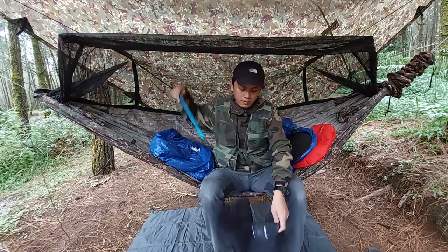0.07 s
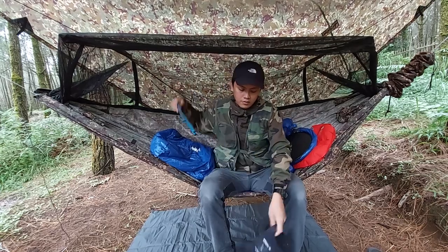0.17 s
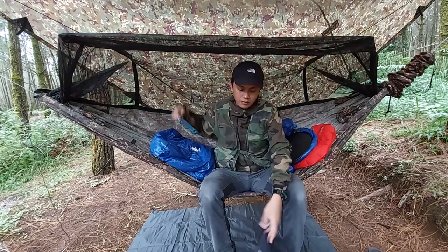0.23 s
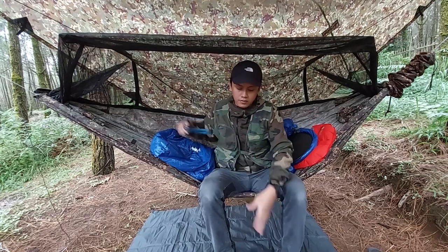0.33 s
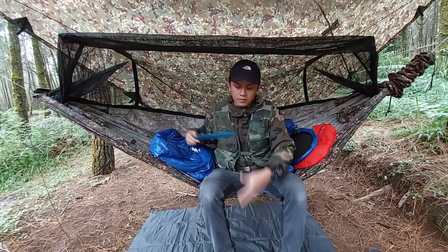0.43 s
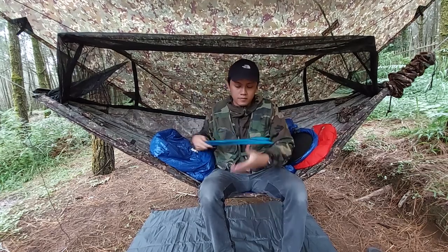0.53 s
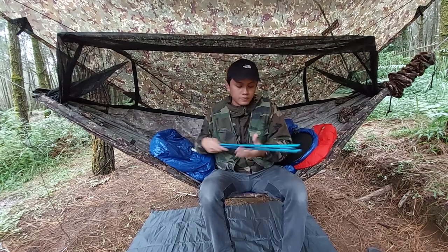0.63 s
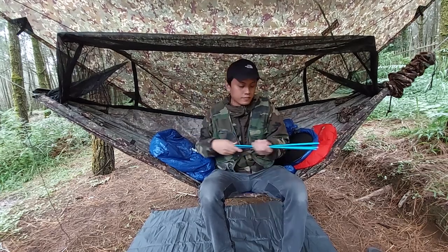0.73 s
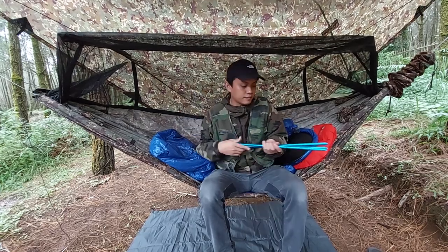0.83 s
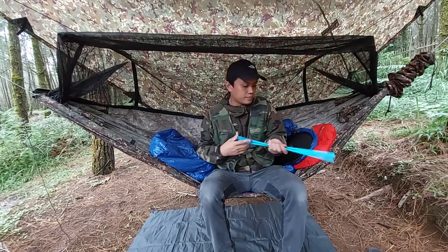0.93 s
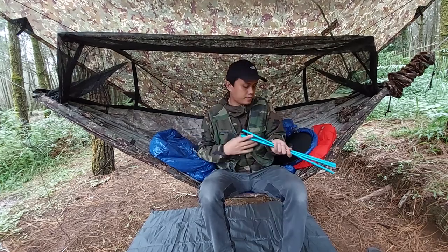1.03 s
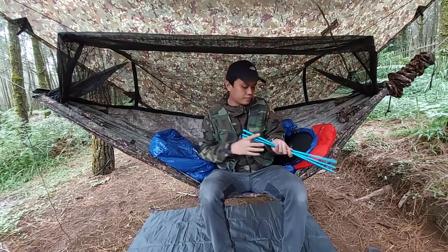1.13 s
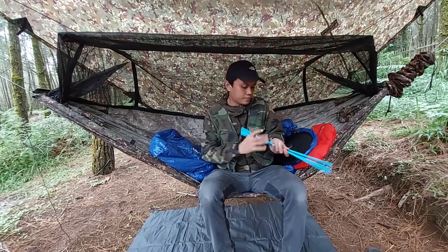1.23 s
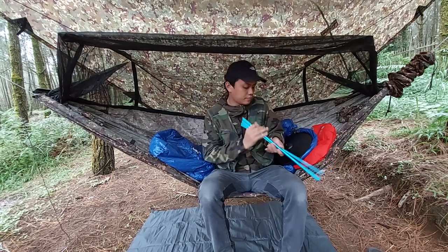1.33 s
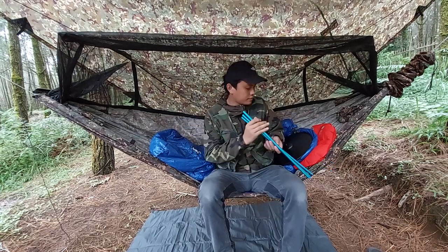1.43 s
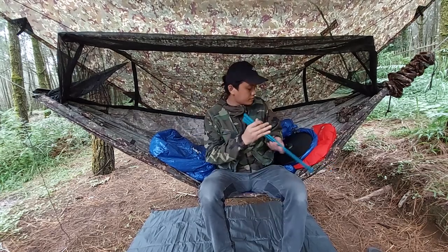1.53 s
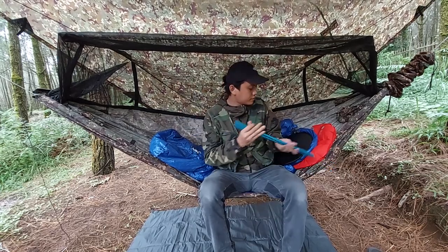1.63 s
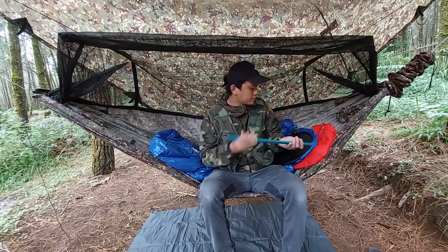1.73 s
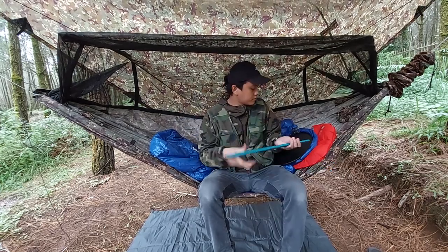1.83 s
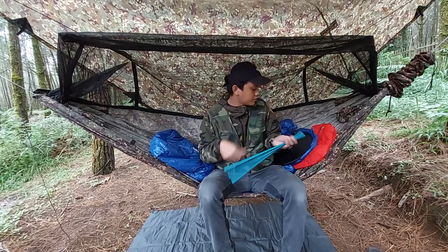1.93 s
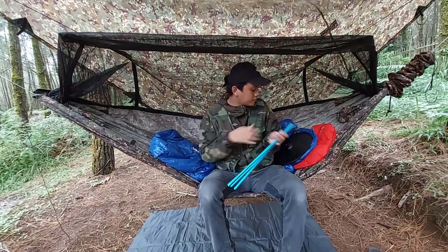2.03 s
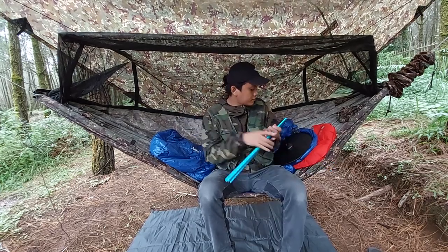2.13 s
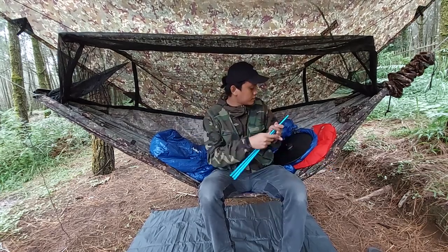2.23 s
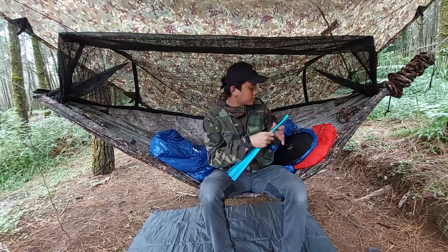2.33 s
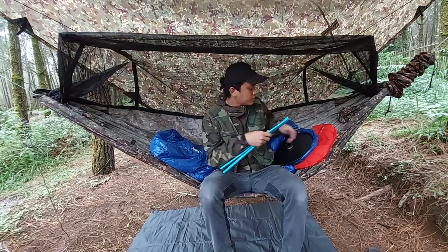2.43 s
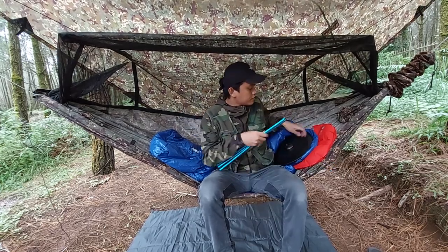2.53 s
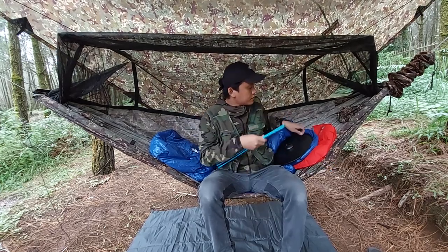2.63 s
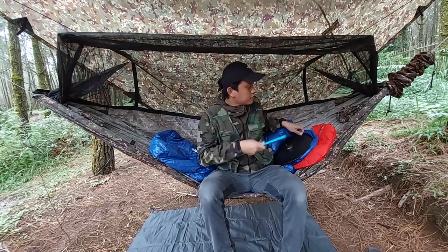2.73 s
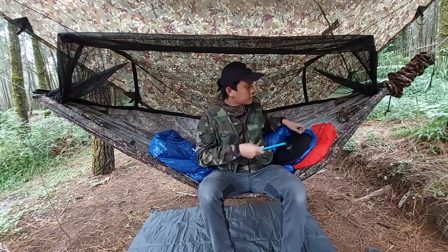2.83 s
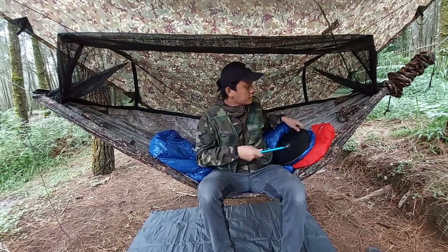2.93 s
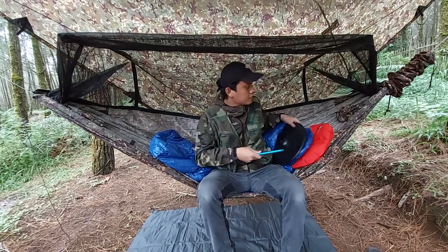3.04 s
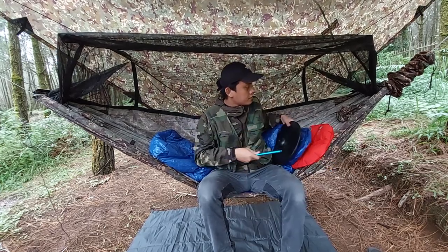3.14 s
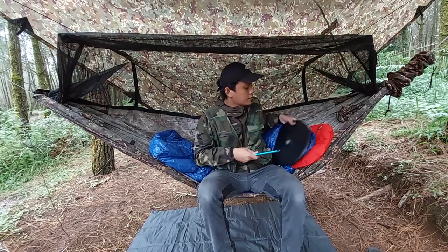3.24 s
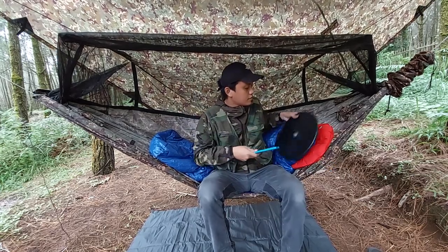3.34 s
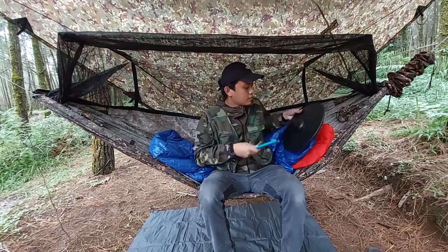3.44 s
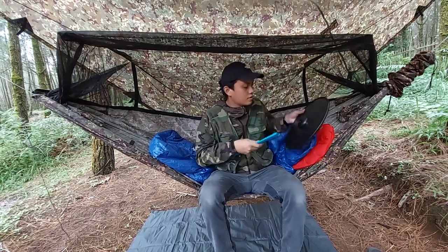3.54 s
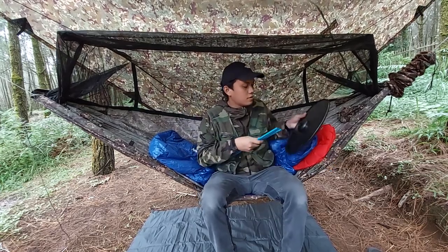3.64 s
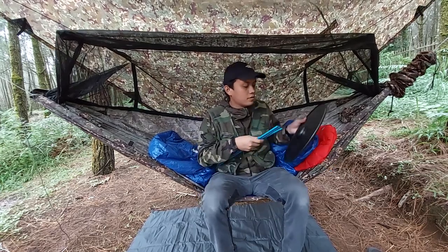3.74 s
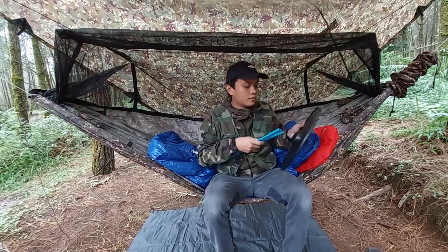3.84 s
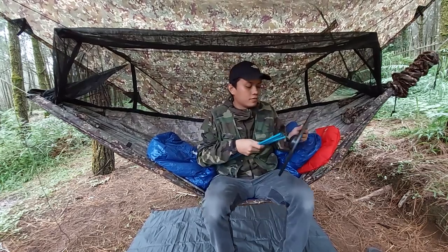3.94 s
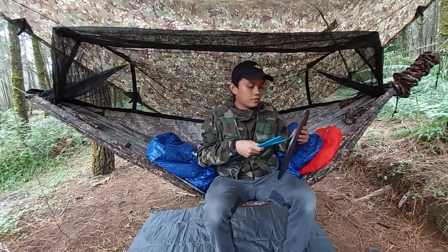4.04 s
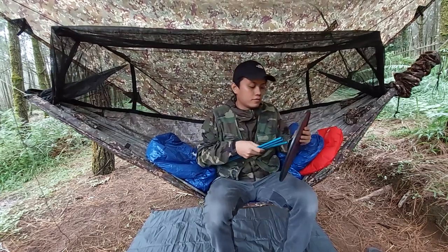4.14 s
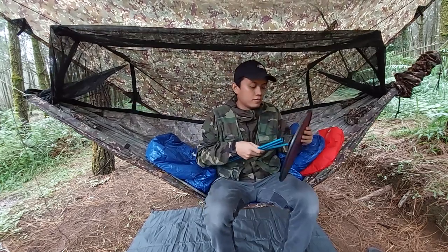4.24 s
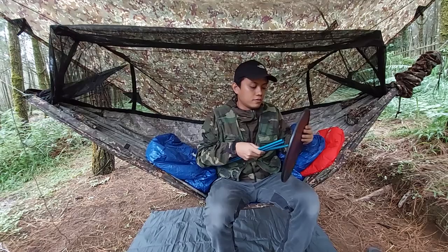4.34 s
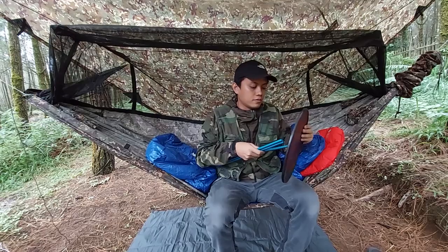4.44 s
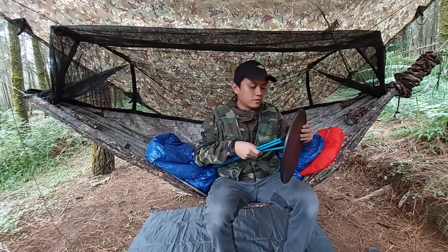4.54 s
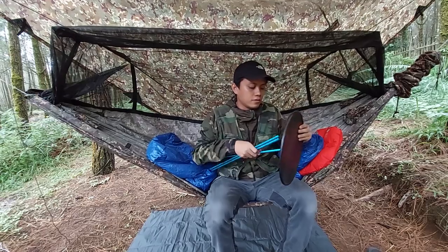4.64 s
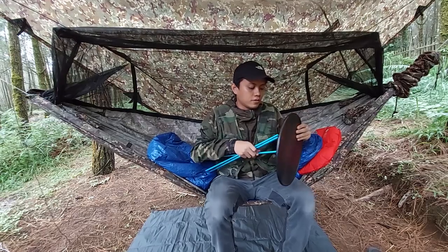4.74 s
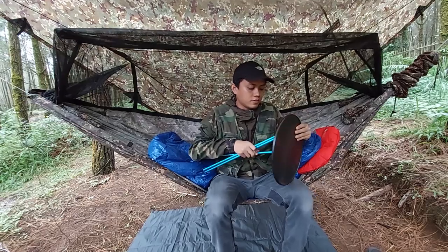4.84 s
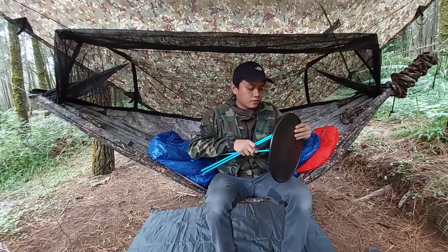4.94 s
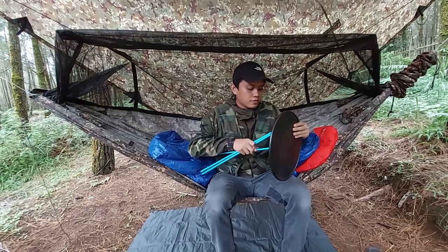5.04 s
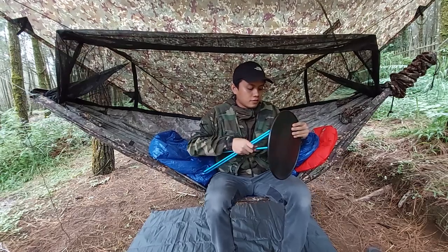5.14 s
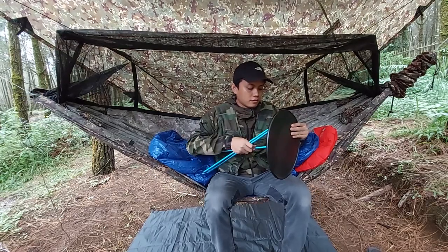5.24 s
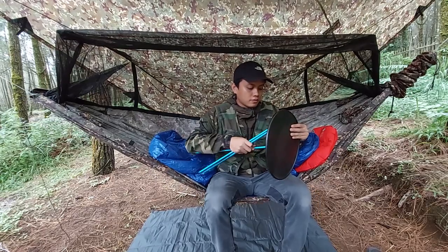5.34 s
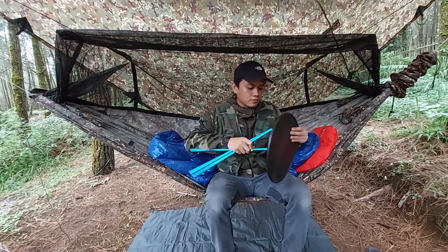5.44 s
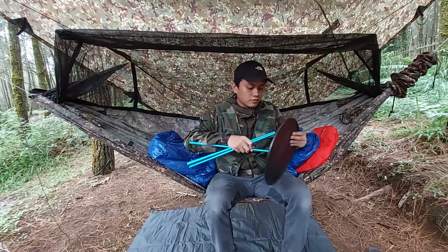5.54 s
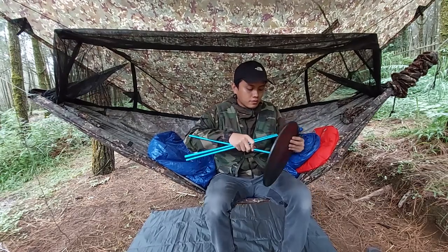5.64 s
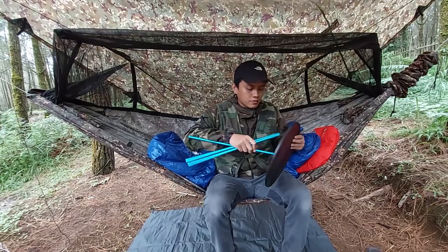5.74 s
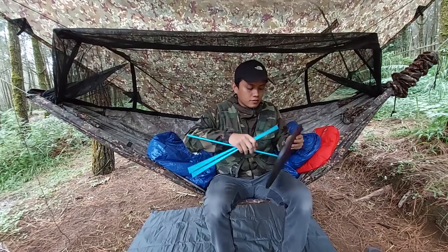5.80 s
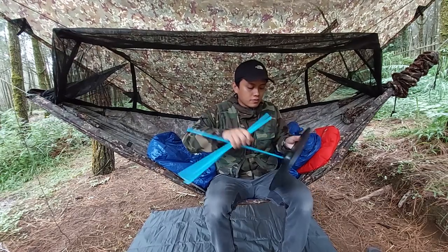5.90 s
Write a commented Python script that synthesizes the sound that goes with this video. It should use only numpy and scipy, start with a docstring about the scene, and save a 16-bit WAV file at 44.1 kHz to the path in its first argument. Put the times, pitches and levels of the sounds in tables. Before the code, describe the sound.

Close handling of a small folding camp table outdoors. A quick fabric swish, a brief ringing slide of a metal leg, then bright clicks that crowd into a sharp snap. Soft cloth rubbing follows, and a few hollow knocks on the light top, the strongest near the end. Cicadas drone steadily over a low air rumble; the mono microphone hears a dry, open forest space.

```python
"""In a forest, a folding camp table is put together. Its carrying bag is whisked away, the jointed aluminium legs
slide, rattle and snap into their hub, then the round top is picked up and knocked against them.
Impacts are struck resonances over a short clatter; slides are resonances kept ringing by tiny jerks.
Cicadas drone all around as bands of noise, the nearest one throbbing, over a low rumble of moving air."""
import sys
import numpy as np
from scipy import signal
from scipy.fft import rfft, irfft, next_fast_len
from scipy.io import wavfile
from scipy.ndimage import uniform_filter1d

SR = 44100
rng = np.random.default_rng(int(sys.argv[2]) if len(sys.argv) > 2 else 0)


def transcribe(signal):
    """Save signal, clipped to [-1, 1], as a 16-bit WAV file at the path in sys.argv[1]."""
    frames = np.atleast_2d(signal).T
    limited = np.clip(frames, -1, 1)
    pcm = np.round(limited * 32767).astype(np.int16)
    wavfile.write(sys.argv[1], SR, pcm)


N = 263277
TIME = np.arange(N) / SR
BLOW_TIME = TIME[:SR // 4]

# legs clicking together: (time [s], middle register level [dB], contact hardness [dB], spot resonance [Hz])
LEG_CLICKS = [(1.339, -52, -8, 5170), (1.7077, -32, 3.5, 7180), (1.766, -43, -5, 4410),
              (1.8676, -53, 2, 4900), (1.89, -42.5, 5, 6700), (1.9406, -29.5, 5.5, 4950),
              (2.0059, -24.5, 5, 5320), (2.2179, -34.5, 7, 6800), (2.3118, -42.5, -8, 5100),
              (2.3679, -34, 9, 5400), (2.373, -29, 8, 5270), (2.387, -17, 0.5, 6800),
              (2.4121, -29, -13, 4160), (2.7202, -48, 36, 4260), (2.8693, -57, -17, 4950),
              (4.172, -45, -12, 6950)]
# resonances of the joined frame: (frequency [Hz], undamped-by-hand width [Hz], relative level [dB])
FRAME_MODES = [(2640, 63, -12), (3657, 13, -6), (3800, 28, -25), (4000, 48, -9), (5160, 90, 1.5),
               (5190, 27, -12), (5370, 58, -2), (5600, 50, -24), (6470, 46, -2.5), (6673, 36, -8),
               (6680, 72, 2), (7150, 68, -4.5), (7650, 38, -21), (8220, 120, -4), (9900, 100, -5),
               (10330, 44, -9), (12360, 21, -13), (11960, 120, -1), (13400, 150, 0), (12500, 160, -2),
               (14600, 98, -7.5)]
# clatter spectrum of the frame: (frequency [Hz], relative density [dB per Hz])
FRAME_CLATTER = [(410, -59), (700, -3), (1090, -33), (1600, -24), (1820, -27), (2590, -10), (2920, -17.5),
                 (4100, -7.5), (4670, -4.5), (5120, -5.5), (5840, -8.5), (6740, -6), (8880, -15.5),
                 (12300, -9.5), (16000, -62)]
CLICK_T60_S = 0.059  # decay of the clatter
CLICK_LOW_DB, CLICK_TREBLE_DB = -19, -3.5  # against the middle register, at hardness 0
HARDNESS_TO_TREBLE = 0.26  # hardness is taken off the lows; this share of it is added to the treble
CLICK_RING_DB, CLICK_DAMPING = 8, 0.66  # clear modes over the clatter; factor on their widths


def leg_clicks():
    """Metal on metal: the harder the contact, the thinner and brighter the click."""
    out = np.zeros(N)
    for s, middle_db, hardness_db, spot_hz in LEG_CLICKS:
        # the touched spot brings out one resonance of its own
        modes = [*FRAME_MODES, (spot_hz, 70, 5)]
        hit = blow(modes, FRAME_CLATTER, CLICK_T60_S, ring_db=CLICK_RING_DB, damping=CLICK_DAMPING,
                   spread_db=6, contact_s=.0005)
        low_db = middle_db + CLICK_LOW_DB - hardness_db
        treble_db = middle_db + CLICK_TREBLE_DB + HARDNESS_TO_TREBLE * hardness_db
        low = register(hit, 1210, 3040, low_db)
        middle = register(hit, 4340, 7700, middle_db)
        treble = register(hit, 8600, .45 * SR, treble_db)
        add(out, s, low + middle + treble)
    return out


# the catch of the hub: (time [s], spike height before the low cut [dB])
SNAPS = [(2.374, -9), (2.3903, -14)]


def snaps():
    """The catch springs home: each snap is one bright spike, a single sample with its lows cut."""
    spikes = np.full(N, 1e-18)
    for s, db in SNAPS:
        add(spikes, s, [from_db(db)])
    return cut_lows(spikes, 4500, order=2)


# one leg slides out and sings: (time [s], level before the low cut [dB], rise [s], fall [s])
LEG_SLIDES = [(.846, -39, .002, .005), (.8525, -29, .001, .008), (.865, -29.5, .007, .008),
              (.883, -38, .006, .007)]
# resonances of a single leg: (frequency [Hz], width [Hz], relative level [dB])
LEG_MODES = [(1450, 34, -16), (2445, 36, -12), (3580, 32, -1), (4970, 40, 0), (5316, 60, -7),
             (6310, 60, -8), (6570, 50, -3), (6716, 50, -8), (8250, 120, -8), (10020, 55, -7),
             (12290, 42, 0), (14140, 55, -8)]
# the bundle of legs scrapes and jingles: (time [s], level before the low cut [dB], rise plus fall [s])
FRAME_SCRAPES = [(1.49, -55, .09), (1.70, -58, 0.052), (1.75, -55, 0.076), (1.825, -54.5, .04),
                 (2.159, -57, .015), (2.206, -37, 0.0087), (2.226, -37, 0.016), (2.319, -43, 0.01),
                 (2.421, -31, 0.0085), (2.56, -61, 0.86)]
SCRAPE_RISE_SHARE = 0.51  # part of a scrape spent growing


def leg_slides():
    """A lone leg sings clearly as it slides; the bundle grates and jingles. Thin tubes radiate no bass."""
    lone = scrape(LEG_SLIDES, LEG_MODES, FRAME_CLATTER, jerks_per_s=2500, grit_db=-8, rough_db=2)
    bundle_strokes = shaped(FRAME_SCRAPES, SCRAPE_RISE_SHARE)
    bundle = scrape(bundle_strokes, FRAME_MODES, FRAME_CLATTER, jerks_per_s=500, grit_db=2, rough_db=-2.5)
    return cut_lows(lone + bundle, 1300, order=3)


# knocks on the table top: (time [s], middle register level [dB], drum note against it [dB], spot resonance [Hz])
TOP_KNOCKS = [(2.72, -46, 5.5, 1340), (4.164, -40.5, -14.5, 1620), (4.302, -57.5, -15, 1480),
              (4.419, -46, 3.5, 1388), (4.479, -51, -11, 1910), (5.034, -36, 6, 1375),
              (5.701, -34, -9, 1340), (5.718, -23, -3, 1130)]
# resonances of the top: (frequency [Hz], width before damping [Hz], relative level [dB])
TOP_MODES = [(215, 27, -40.5), (291.6, 25.6, 10.5), (335, 18, -6), (498, 33, -12), (646, 31, -5.5),
             (950, 140, -9), (1250, 57, -18), (1404, 49, 1.5), (1360, 63, -24.5), (1724, 50, -24),
             (2080, 31, -0.5), (2250, 49, -47), (2580, 55, 3), (3290, 15, -11), (3850, 54, -68),
             (4036, 98, -8)]
# clatter spectrum of the top: (frequency [Hz], relative density [dB per Hz])
TOP_CLATTER = [(88, -33), (150, 0), (303, -5), (662, -9.5), (790, -7), (1120, -3), (1900, -12.5),
               (3290, -21.5), (6020, -30), (7040, -27), (8730, -45), (11900, -36), (16000, -39)]
KNOCK_T60_S, KNOCK_SPOT_DB = 0.061, 5  # decay of the clatter; strength of the spot resonance
KNOCK_RING_DB, KNOCK_DAMPING = 9, 0.8  # clear modes over the clatter; factor on their widths
CRACK_DB, CRACK_AT_DB = -40.5, -40  # crack level at a weightless reference knock, and that knock's level
CRACK_GROWTH = .42  # the crack grows more slowly than the knock
CRACK_LOSS = 0.13  # share of the drum note's weight that the crack loses


def top_knocks():
    """The light disc answers with a hollow, drum-like note and a short crack; weighty knocks are duller."""
    out = np.zeros(N)
    for s, middle_db, weight_db, spot_hz in TOP_KNOCKS:
        modes = [*TOP_MODES, (spot_hz, 90, KNOCK_SPOT_DB)]
        hit = blow(modes, TOP_CLATTER, KNOCK_T60_S, ring_db=KNOCK_RING_DB, damping=KNOCK_DAMPING,
                   spread_db=1.5, contact_s=.001)
        crack_db = CRACK_DB + CRACK_GROWTH * (middle_db - CRACK_AT_DB) - CRACK_LOSS * weight_db
        drum = register(hit, 162, 535, middle_db + weight_db)
        middle = register(hit, 650, 1840, middle_db)
        crack = register(hit, 3410, 13000, min(crack_db, middle_db))
        add(out, s, drum + middle + crack)
    return out


# the bag whisked along: (time [s], level before the low cut [dB], rise [s], fall [s])
SWISHES = [(.375, -21, .004, .0048), (.362, -35, .004, .008), (.385, -31.5, .006, .009),
           (.588, -49, .002, .009)]
# resonances of the bag: (frequency [Hz], width [Hz], relative level [dB])
BAG_MODES = [(1435, 80, -11), (1660, 80, -11), (2044, 70, -2), (2290, 70, 1), (2567, 60, -2),
             (2950, 60, -8), (3420, 90, -11), (4400, 110, -11), (4650, 90, -10), (5250, 90, -10)]
# grit of the fabric: (frequency [Hz], relative density [dB per Hz])
FABRIC = [(200, -24), (700, -20), (1100, -14), (1600, -8), (2050, 0), (2550, 1), (2900, -10), (5200, -12),
          (6200, -20), (7200, -19), (8700, -28), (11000, -24), (13000, -24), (16000, -34)]
# the loose cloth billows and settles: (time [s], level before the low cut [dB], rise plus fall [s])
BILLOWS = [(.377, -38.5, 0.013), (.45, -56, 0.12)]
BILLOW_HZ, BILLOW_WIDTH_HZ = 1350, 2900
ZIP_DB, ZIP_HZ, ZIP_WIDTH_HZ = -7, 4930, 3200  # the hiss of the weave, against the swish
RUB_RISE_SHARE = 0.49  # part of a billow or rub spent growing


def bag():
    """The bag zips past in jerks of fabric, its weave hisses and the loose cloth billows as broad noise."""
    swish = scrape(SWISHES, BAG_MODES, FABRIC, jerks_per_s=3200, grit_db=7, rough_db=1.4)
    weave = from_db(ZIP_DB) * swells(SWISHES) * buzz(ZIP_HZ, ZIP_WIDTH_HZ)
    billow = swells(shaped(BILLOWS, RUB_RISE_SHARE)) * buzz(BILLOW_HZ, BILLOW_WIDTH_HZ)
    return cut_lows(swish + weave + billow, 250, order=2)


# hands and sleeves rubbing on the parts: (time [s], level [dB], rise plus fall [s])
RUBS = [(1.85, -67, 1), (2.72, -60, 0.24), (3.3, -74, 0.059), (3.5, -62.5, 0.61), (4.3, -62.5, 0.37),
        (5.55, -72, 0.19)]
# colour of the rubbing: (frequency [Hz], relative density [dB per Hz])
RUB = [(180, -1.5), (260, -4.5), (340, -4), (450, -13.5), (800, -19.5), (1050, -19), (1450, -19),
       (2200, -25)]
RUB_REST_DB = -77.5  # between strokes the clothes still stir


def rubbing():
    """Hands and sleeves rub as soft noise with a rough, random grain."""
    force = np.hypot(from_db(RUB_REST_DB), swells(shaped(RUBS, RUB_RISE_SHARE)))
    return force * rms_one(coloured(RUB) * from_db(drift(33)))


# friction on a held part: (time [s], level [dB], rise plus fall [s], resonance [Hz], width [Hz])
SCUFFS = [(1.449, -55, 0.042, 357, 203), (1.54, -67.5, 0.33, 527, 225), (1.753, -50, 0.048, 4320, 120),
          (2.536, -61, 0.32, 700, 200), (2.497, -62, 0.23, 1483, 160), (2.956, -69, 0.13, 1500, 71.3),
          (3.403, -62.5, .11, 1985, 40), (3.46, -68.5, 0.41, 786, 90), (3.54, -56, 0.21, 241, 30),
          (3.77, -67, .13, 1580, 40), (5.002, -38.5, 0.0042, 4100, 704)]
SCUFF_RISE_SHARE = 0.41


def scuffs():
    """Friction catches one resonance of a held part and fills it with noise."""
    out = np.zeros(N)
    for *stroke, hz, width in SCUFFS:
        out += swells(shaped([stroke], SCUFF_RISE_SHARE)) * buzz(hz, width)
    return out


# soft bumps on the hammock and the top: (time [s], peak level [dB], pitch [Hz], envelope time constant [s])
BUMPS = [(2.566, -27, 94, 0.0042), (5.007, -50, 287, 0.01)]


def bumps():
    """A soft bump is a brief low tone that swells and fades symmetrically."""
    out = np.zeros(N)
    for s, db, hz, length in BUMPS:
        since = TIME - s
        envelope = 1 / np.cosh((since / length).clip(-20, 20))
        out += from_db(db) * np.cos(2 * np.pi * hz * since) * envelope
    return out


# bands of the nearest cicada: (centre [Hz], width [Hz], level before throb and warm-up [dB])
CICADA_BANDS = [(3760, 290, -60), (6740, 670, -70), (10610, 580, -72), (14200, 610, -77.5)]
# colour of the far chorus: (frequency [Hz], relative density [dB per Hz])
CHORUS = [(1500, -50), (2000, -18.5), (2600, -11.5), (3200, -3.5), (3700, -1.5), (4200, -11.5), (5000, -15),
          (6000, -23), (7300, -12.5), (8100, -35), (12000, -23.5), (16000, -41)]
CHORUS_DB = -56.5
THROB_HZ, THROB_DB = 13.7, 4.5  # mean rate; swing each way in the top band
CICADA_START_DB, CICADA_WARM_UP_S = -7.5, 0.92  # the nearest cicada swells, then holds
HIGH_INSECT_DB, HIGH_INSECT_STOP_S, HIGH_INSECT_FADE_DB_PER_S = -68, 0.87, 95


def cicadas():
    """A far chorus hisses; the nearest insect swells and throbs, deepest in its overtones; a higher one stops."""
    throb_hz = THROB_HZ + .25 * drift(2)
    throb_db = THROB_DB * np.sin(2 * np.pi * np.cumsum(throb_hz) / SR)
    top_hz = CICADA_BANDS[-1][0]
    near = sum(buzz(hz, width) * from_db(db + throb_db * (hz / top_hz) ** 2) for hz, width, db in CICADA_BANDS)
    effort_db = CICADA_START_DB * np.maximum(0, 1 - TIME / CICADA_WARM_UP_S)
    high_db = HIGH_INSECT_DB - HIGH_INSECT_FADE_DB_PER_S * np.maximum(0, TIME - HIGH_INSECT_STOP_S)
    chorus = from_db(CHORUS_DB) * coloured(CHORUS)
    return chorus + from_db(effort_db) * near + from_db(high_db) * buzz(5200, 700)


# slow swell of the air's rumble: (time [s], level before flutter [dB])
AIR_LEVEL = [(0, -56), (.5, -49), (1.1, -46.5), (2.2, -49.5), (3.5, -49.5), (4.7, -59), (5.35, -48),
             (5.97, -58)]
# colour of the rumble: (frequency [Hz], relative density [dB per Hz])
AIR = [(30, -26), (42, 6.5), (58, -8.5), (72, -2.5), (86, 5.5), (103, -1.5), (128, -5), (175, -16),
       (245, -17.5), (330, -28.5), (500, -40.5)]
# colour of the forest's hush: (frequency [Hz], relative density [dB per Hz])
FOREST = [(88, -43), (150, -24), (214, -5.5), (411, -26), (484, -16.5), (662, -27), (2000, -27.5),
          (2600, -49), (4400, -120)]
AIR_FLUTTER_DB, AIR_FLUTTER_PER_S = 1, 3.1  # rms depth; corner rate


def air():
    """Moving air rumbles, swelling slowly and fluttering at random, over the faint hush of the forest."""
    flutter = from_db(AIR_FLUTTER_DB * drift(AIR_FLUTTER_PER_S))
    rumble = level(AIR_LEVEL) * rms_one(coloured(AIR) * flutter)
    return rumble + from_db(-72.5) * coloured(FOREST)


ECHO_DB, ECHO_T60_S, ECHO_DULL_HZ = -26, .24, 4500


def trees(x):
    """Tarp, ground and trunks scatter back a faint, dull tail of decaying noise."""
    tail = noise(lambda hz: 1 / np.hypot(1, hz / ECHO_DULL_HZ), size=SR)
    tail *= from_db(-60 * TIME[:SR] / ECHO_T60_S)
    tail *= TIME[:SR] > .006  # nothing returns sooner
    return from_db(ECHO_DB) * signal.fftconvolve(x, tail / np.linalg.norm(tail))[:N]


def blow(modes, clatter, t60, ring_db, damping, spread_db, contact_s):
    """One contact: a dense, quickly dying clatter and clear modes, each struck with a strength of its own."""
    hz, width, db = np.transpose(modes)[:, :, None]
    strength = from_db(db + spread_db * rng.uniform(-1, 1, size=hz.shape)) * np.sqrt(width)
    strength = strength * rng.choice([-1, 1], hz.shape)
    rings = strength * np.sin(2 * np.pi * hz * BLOW_TIME) * np.exp(-np.pi * width * damping * BLOW_TIME)
    ringing = rings.sum(axis=0) / np.sqrt(np.sum(strength ** 2))
    dense = coloured(clatter, size=len(BLOW_TIME)) * from_db(-60 * BLOW_TIME / t60)
    # the force builds up while the parts meet
    pressure = np.minimum(1, BLOW_TIME / contact_s) ** 2
    return pressure * (dense + from_db(ring_db) * ringing)


def register(x, low_hz, high_hz, db):
    """One register of a blow, with its loudest 3 ms at the given level."""
    part = signal.sosfilt(signal.butter(3, [low_hz, high_hz], "band", fs=SR, output="sos"), x)
    return from_db(db) * part / np.sqrt(uniform_filter1d(part ** 2, size=132).max())


def scrape(strokes, modes, grit_spectrum, jerks_per_s, grit_db, rough_db):
    """A surface slips in tiny jerks that keep its modes ringing, over a gritty hiss."""
    force = swells(strokes)
    slips = rng.standard_normal(N) * (rng.random(N) < jerks_per_s / SR)
    jerks = force * rms_one(slips) + 1e-18
    rings = np.zeros(N)
    for hz, width, db in modes:
        resonance = signal.lfilter(*signal.iirpeak(hz, hz / width, fs=SR), jerks)
        rings += from_db(db) / np.sqrt(np.pi * width / SR) * resonance  # wide modes get no advantage
    rings = rings / np.linalg.norm(from_db(np.array(modes)[:, 2]))
    grit = force * rms_one(coloured(grit_spectrum) * from_db(rough_db * drift(320)))
    return (rings + from_db(grit_db) * grit) / np.hypot(1, from_db(grit_db))


def shaped(rows, rise_share):
    """Split each stroke's length into a rise and a fall."""
    return [(s, db, rise_share * length, (1 - rise_share) * length) for s, db, length in rows]


def swells(rows):
    """Envelope of strokes that grow and die exponentially, summed as powers."""
    power = np.zeros(N)
    for s, db, rise, fall in rows:
        distance = np.maximum((s - TIME) / rise, (TIME - s) / fall).clip(0, 20)
        power += from_db(2 * db) * np.exp(-2 * distance)
    return np.sqrt(power)


def buzz(centre_hz, width_hz):
    """Noise in one resonance with steep flanks."""
    return noise(lambda hz: 1 / (1 + ((hz - centre_hz) / width_hz * 2) ** 2 / 2))


def drift(rate):
    """Slow random wandering of rms 1, weakening above the given rate in Hz."""
    return noise(lambda hz: 1 / (1 + (hz / rate) ** 2))


def coloured(spectrum, size=N):
    """Noise with a tabled spectrum that falls away beyond its ends."""
    points_hz, points_db = np.transpose(spectrum)

    def gain_at(hz):
        """Interpolate over log frequency, with skirts outside the table."""
        skirts = np.minimum(1, np.minimum(hz / points_hz[0], points_hz[-1] / hz)) ** 2
        return from_db(np.interp(np.log(hz), np.log(points_hz), points_db)) * skirts

    return noise(gain_at, size)


def noise(gain_at, size=N):
    """Noise of rms 1 whose colour is a function of frequency."""
    padded = next_fast_len(size)
    hz = np.maximum(np.fft.rfftfreq(padded, 1 / SR), 1)
    return rms_one(irfft(rfft(rng.standard_normal(padded)) * gain_at(hz), padded)[:size])


def cut_lows(x, hz, order):
    """High-pass filter."""
    return signal.sosfilt(signal.butter(order, hz, "high", fs=SR, output="sos"), x)


def from_db(db):
    """Decibels to gain."""
    return 10 ** (np.asarray(db) / 20)


def rms_one(x):
    """Scale to rms 1."""
    return x / np.sqrt(np.mean(x ** 2) + 1e-20)


def level(rows):
    """Gain over time from (time [s], level [dB]) rows."""
    return from_db(np.interp(TIME, *np.transpose(rows)))


def add(out, s, sound):
    """Mix a sound in at time s."""
    start = round(s * SR)
    out[start:start + len(sound)] += sound[:N - start]


def scene():
    """The table's parts close by, the forest all around."""
    handling = bag() + rubbing() + scuffs() + bumps()
    table = leg_clicks() + snaps() + leg_slides() + top_knocks() + handling
    return (table + trees(table) + cicadas() + air())[None]


LOW_CUT_HZ, CUTOFF_HZ = 41, 16000


def record(dry):
    """The microphone drops the deepest rumble; the top of the spectrum is cut steeply."""
    heard = cut_lows(dry, LOW_CUT_HZ, order=6)
    return signal.sosfilt(signal.ellip(10, .2, 80, CUTOFF_HZ, fs=SR, output="sos"), heard)


dry = scene()
out = record(dry)
transcribe(out)
```